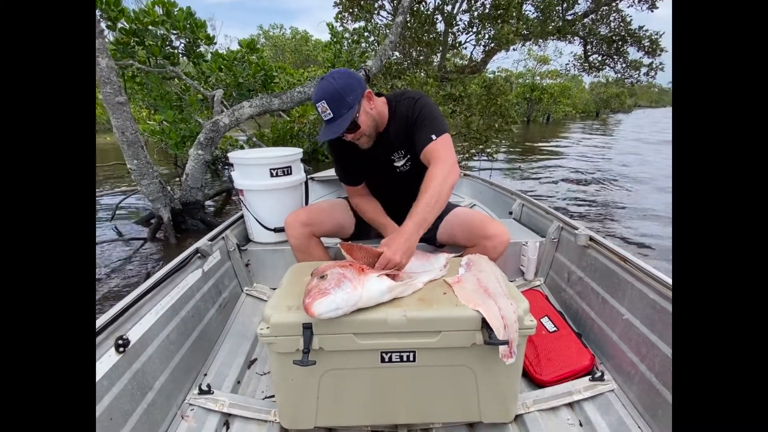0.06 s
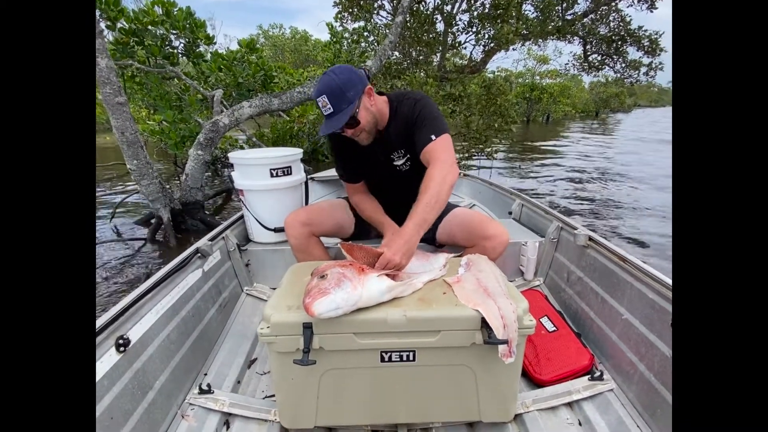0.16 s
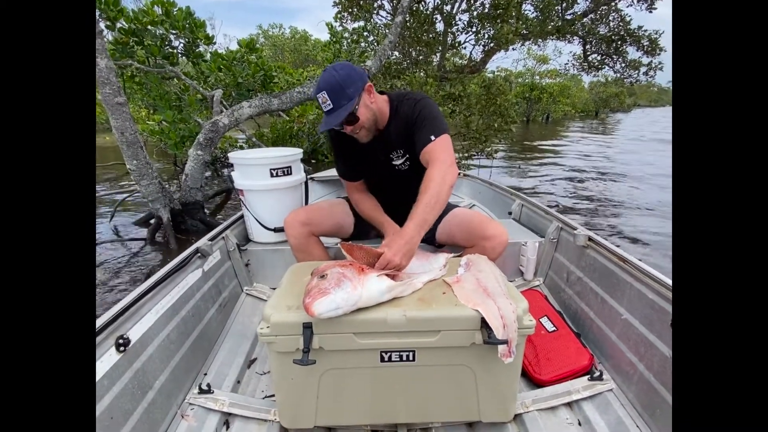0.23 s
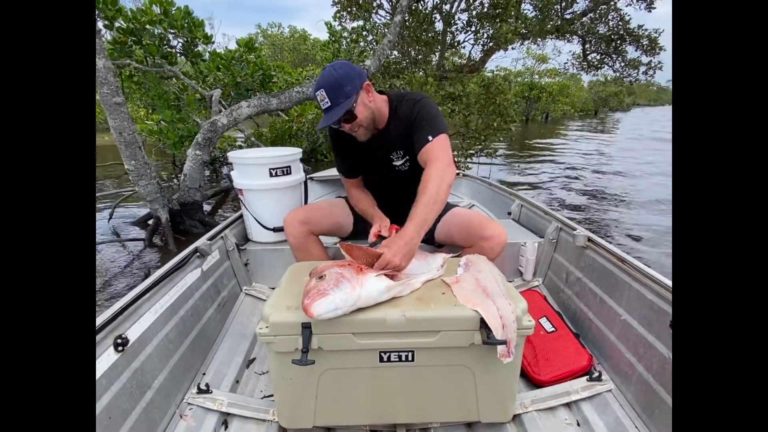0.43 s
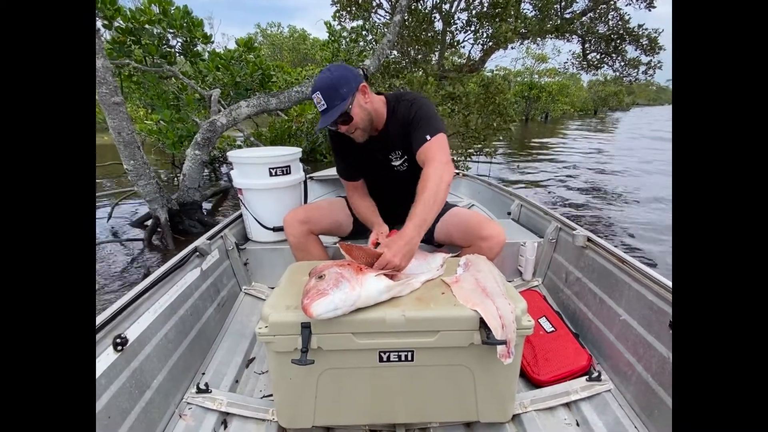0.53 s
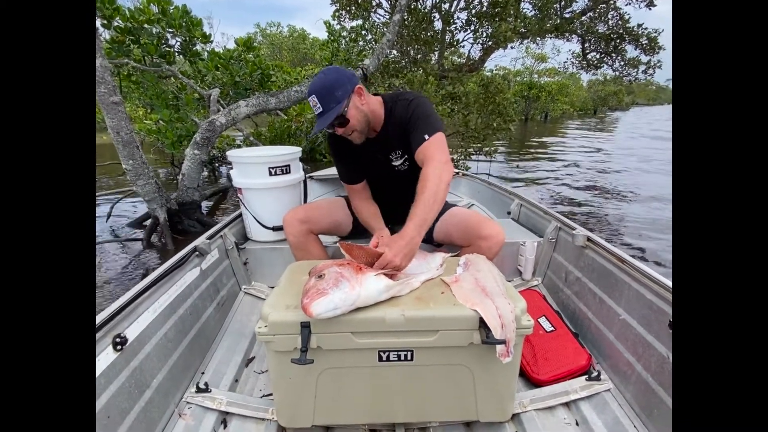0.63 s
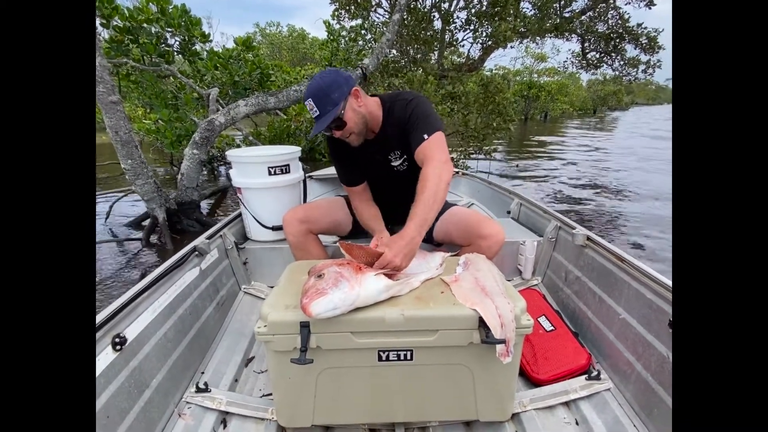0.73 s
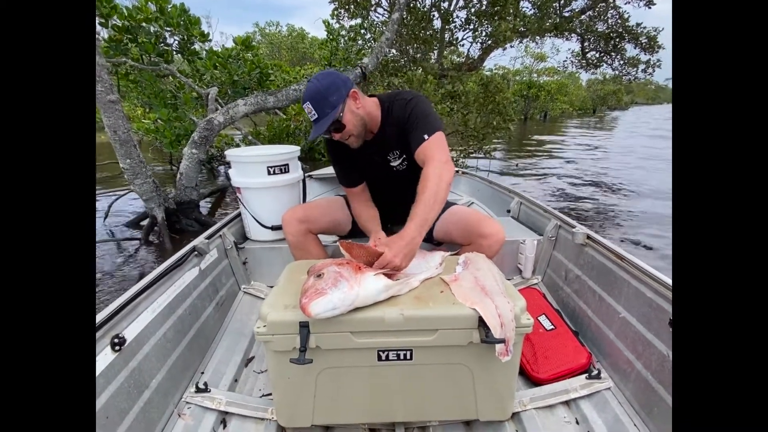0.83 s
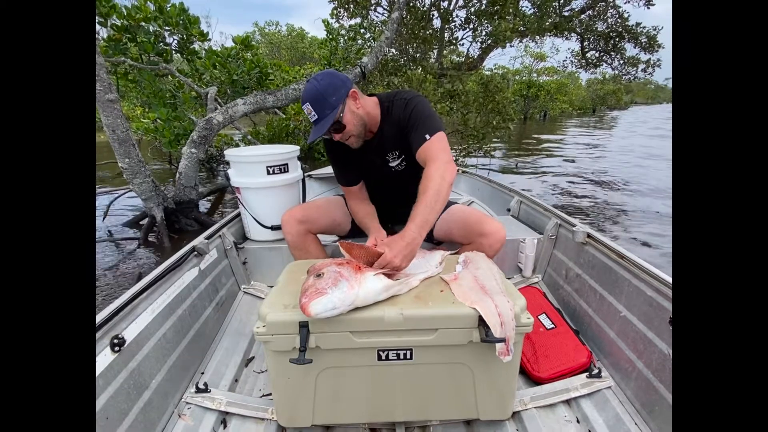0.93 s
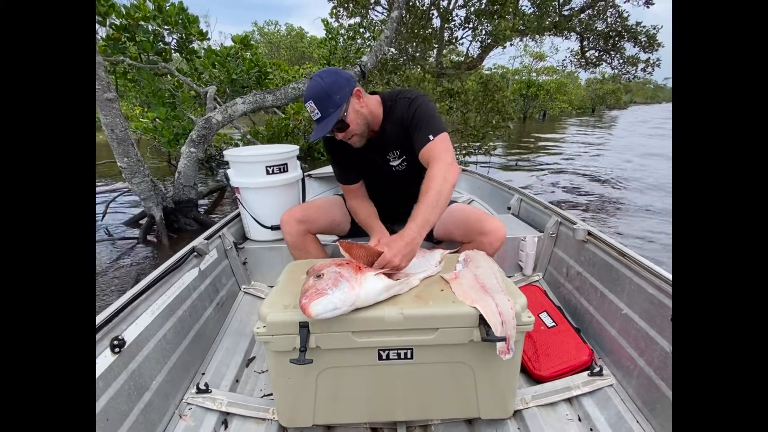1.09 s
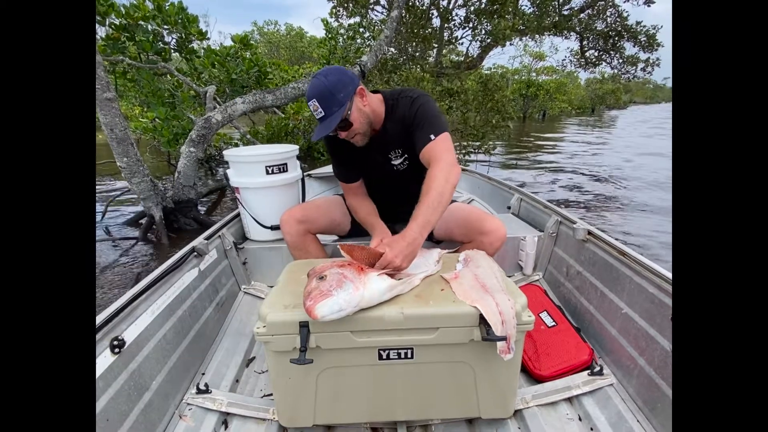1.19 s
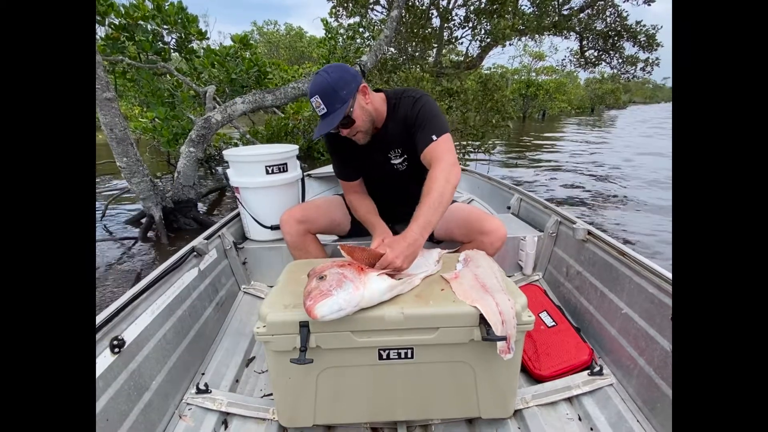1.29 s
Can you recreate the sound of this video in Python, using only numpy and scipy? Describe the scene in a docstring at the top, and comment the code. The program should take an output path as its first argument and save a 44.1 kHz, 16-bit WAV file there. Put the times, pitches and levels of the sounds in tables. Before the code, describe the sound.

A knife works through fish bones, close by. A short scrape leads to the loudest sound, a sharp crunch at about 0.2 seconds, followed by two small snaps and soft wet thumps on a cooler lid until 0.5. Quiet ticks follow, with a thin steel ping near 0.8. Another bone snaps around 1.15, and brief scrapes continue to 1.3. Faint air and lapping water lie underneath.

```python
"""A wet fish slides and thumps softly on a cool box lid, over a faint wash of air and water.
A fillet knife ticks on fine bones and scrapes along the ribs by stick-slip friction. One rib
crunches in a run of tiny fractures as the blade drives the modes of lid, bone and steel.
Smaller bones snap, the fish thumps down, the steel pings off a bone and the scraping goes on.
The sides of the small open boat return short reflections of the work."""
import sys
import numpy as np
from scipy import signal
from scipy.fft import rfft, irfft, next_fast_len
from scipy.io import wavfile

SR = 44100
rng = np.random.default_rng(int(sys.argv[2]) if len(sys.argv) > 2 else 0)


def file_out(sig):
    """Save sig as 16-bit WAV at sys.argv[1]."""
    # one column per channel
    cols = np.atleast_2d(sig).T
    # limit, then scale
    lim = np.clip(cols, -1, 1)
    pcm = np.round(lim * 32767).astype(np.int16)
    wavfile.write(sys.argv[1], SR, pcm)


N = 59535
T = np.arange(N) / SR

# spectrum of air and water (frequency [Hz], gain [dB])
WASH_SPECTRUM = [(18, -67), (30, -45.5), (154, -6.5), (437, -3), (1240, -20), (1410, -19), (2770, -25.5),
                 (4540, -30.5), (6360, -38), (15000, -52.5)]
# course of the fish's sliding (time [s], level [dB])
SLIDE_LEVELS = [(0, -64), (.1, -67), (.16, -71), (.27, -57), (.41, -62.5), (0.472, -68), (.55, -66.5),
                (.66, -72), (0.799, -77), (1.08, -76), (1.201, -69), (1.35, -65)]
# spectrum of skin on the lid (frequency [Hz], gain [dB])
SLIDE_SPECTRUM = [(40, -16), (90, 4.5), (200, 7), (520, 3.5), (850, -2), (1400, 0.5), (2500, -16.5),
                  (4500, -22), (7000, -33.5), (15000, -66.5)]
# blows on the lid (time [s], ring level [dB], frequency [Hz], decay [s], slap level [dB])
THUMPS = [(.003, -65, 201.5, 0.012, -61.5), (.047, -56, 190, 0.0027, -85), (.246, -44, 276, 0.0025, -54),
          (0.255, -54.5, 113, 0.0094, -45.5), (0.345, -56, 287, 0.013, -65.5),
          (0.3694, -40.5, 119, 0.0075, -47.5), (0.4, -48, 173.3, 0.024, -50),
          (0.4185, -44.5, 113, 0.0034, -51.5), (0.475, -60.5, 127.5, 0.017, -64.5),
          (.507, -63, 280, 0.032, -61.5), (0.536, -62.5, 85, 0.015, -59),
          (0.939, -63.5, 335, 0.0056, -69.5), (1.162, -52.5, 398, 0.014, -66),
          (1.189, -56.5, 316, 0.015, -60)]
# spectrum of slapped flesh (frequency [Hz], gain [dB])
SLAP_SPECTRUM = [(50, -36.5), (100, -4), (280, 5), (550, 6), (750, -3.5), (1100, -28), (2500, -35.5),
                 (8000, -62.5)]
# touches of the tip (time [s], level [dB], frequency [Hz], bandwidth [Hz], decay [s])
TICKS = [(0.071, -70.5, 3550, 2200, 0.007), (.153, -65, 1970, 500, 0.014), (0.18, -65, 4570, 5050, 0.001),
         (0.3673, -60.5, 3730, 900, 0.002), (0.4949, -63.5, 4400, 700, 0.0036),
         (.593, -67, 1780, 505, 0.029), (0.673, -54.5, 1480, 323, 0.003), (0.885, -69.5, 1956, 423, 0.016),
         (0.9741, -54, 3770, 1520, 0.0066), (1.039, -68.5, 4470, 1300, 0.0023),
         (1.2062, -65, 6240, 3530, 0.0046), (1.238, -62, 3940, 1820, 0.03)]
# blade strokes (time [s], rise [s], hold [s], decay [s], level [dB], tilt [dB/octave], cutoff [Hz])
STROKES = [(0.176, 0.018, 0.022, 0.0062, -53, 1, 14400), (0.281, 0.0063, .012, 0.014, -54, -4, 9000),
           (0.573, 0.01, 0.057, 0.012, -68.5, -8, 6100), (1.056, 0.094, 0.04, 0.062, -68.5, -0.4, 4860),
           (1.151, 0.0032, 0.0065, 0.041, -57, 0.5, 5300), (1.267, 0.012, 0.013, 0.01, -52, -0.5, 10600),
           (1.304, 0.0072, 0.0067, 0.018, -60, 1.5, 5500)]
# spectrum of steel on bone (frequency [Hz], gain [dB])
SCRAPE_SPECTRUM = [(100, -27), (300, -6.5), (550, 6), (1100, 1), (1900, 2), (4200, -4), (6000, -13),
                   (9000, -23), (15000, -35.5)]
# spectrum of the breaking rib (frequency [Hz], gain [dB])
CRUNCH_SPECTRUM = [(250, -58.5), (650, 0.5), (1200, 2), (2100, -3), (2700, -1), (4400, -2.5), (5600, -8),
                   (7000, -17), (10000, -26.5), (15000, -42.5)]
# one hard push through the rib, two soft knocks (time [s], push [s], gain [dB], cutoff [Hz])
KNOCKS = [(0.2199, 0.02327, -0.5, 9000), (0.261, 0.0062, -11.5, 900), (.302, 0.0083, -20.5, 800)]
# modes of lid, bone and blade (frequency [Hz], level [dB])
MODES = [(443, -39), (500, -33.5), (565, -39.5), (683, -32), (890, -44), (1025, -37.5), (1178, -42.5),
         (1238, -39), (1497, -43.5), (1702, -37), (1778, -41), (2590, -42.5), (3270, -45.5), (4346, -48.5),
         (5372, -44)]
# small bones breaking (time [s], hold [s], decay [s], low ring [Hz], its level [dB],
# high ring [Hz], its level [dB], crack level [dB], cutoff [Hz])
SNAPS = [(0.2985, 0.003, 0.0074, 1700, -53.5, 3230, -45.5, -44, 9100),
         (0.328, 0.0063, 0.0073, 1650, -47.5, 3890, -46.5, -54, 10300),
         (1.159, 0.0013, 0.0074, 1698, -47, 3850, -50, -60, 6900)]
# spectrum of a small bone's crack (frequency [Hz], gain [dB])
CRACK_SPECTRUM = [(250, -21), (650, 7), (1200, 15), (3000, 21), (5000, -2), (8300, -6.5), (15000, -57)]
# resonances of the steel (frequency [Hz], bandwidth [Hz], level [dB])
BLADE_RESONANCES = [(2220, 670, -58), (3530, 520, -65), (4880, 920, -54), (6900, 1040, -64.5)]


def amp(db):
    """Amplitude ratio of a level in decibels."""
    return 10 ** (np.asarray(db) / 20)


def envelope(start, rise, hold, fade):
    """Linear rise, hold and exponential decay, all in seconds."""
    age = T - start
    return np.clip(age / max(rise, 1e-4), 0, 1) * np.exp(-np.maximum(age - rise - hold, 0) / fade)


def match_energy(x, env):
    """Normalisation: x takes the energy of unit noise under the envelope."""
    return x * np.sqrt(np.sum(env ** 2) / (np.sum(x ** 2) + 1e-20))


def colour(x, spectrum, tilt_db=0):
    """Minimum-phase filtering by a spectrum, tilted per octave above 500 Hz."""
    size = next_fast_len(2 * N)
    size += size % 2
    octave = np.log2(np.maximum(np.arange(size // 2 + 1) * SR / size, 10))
    hz, db = np.array(spectrum, float).T
    gain_db = np.interp(octave, np.log2(hz), db) + tilt_db * np.maximum(octave - np.log2(500), 0)
    cepstrum = irfft(np.log(amp(gain_db)))
    cepstrum[1:size // 2] *= 2  # folding makes the filter causal
    cepstrum[size // 2 + 1:] = 0
    return irfft(rfft(x, size) * np.exp(rfft(cepstrum)))[:N]


def resonate(x, hz, width_hz, order=1):
    """Band-pass resonance; a higher order has steeper sides."""
    low = np.hypot(hz, width_hz / 2) - width_hz / 2
    sos = signal.butter(order, [low, low + width_hz], "band", fs=SR, output="sos")
    return signal.sosfilt(sos, x + 1e-18)


def butterworth(x, hz, kind, order):
    """Maximally flat low-pass or high-pass filtering."""
    return signal.sosfilt(signal.butter(order, hz, kind, fs=SR, output="sos"), x + 1e-18)


def waver(per_s, db):
    """Random modulation: a factor that wanders by about db."""
    drift = np.interp(T * per_s, np.arange(N), rng.standard_normal(N))
    return amp(db * np.clip(drift, -2, 2))


def grit(per_s, scatter_db=4, hiss=0.64):
    """Shot noise: randomly timed clicks over friction hiss."""
    clicks = (rng.random(N) < per_s / SR) * rng.choice([-1, 1], N)
    clicks = clicks * amp(scatter_db * np.clip(rng.standard_normal(N), -2, 2))
    return clicks / clicks.std() + hiss * rng.standard_normal(N)


def air_and_water():
    """Ambient noise: steady air above, and lapping water that modulates the low band."""
    crossover_hz = 630
    air, water = (colour(rng.standard_normal(N), WASH_SPECTRUM) for _ in range(2))
    air = butterworth(air, crossover_hz, "high", order=2)
    water = butterworth(water, crossover_hz, "low", order=2) * waver(per_s=22, db=5)
    wash = air + water
    return amp(-72.5) * wash / wash.std()


def fish_slide():
    """Stick-slip friction: wet skin drags over the lid in small steps."""
    times, db = np.array(SLIDE_LEVELS).T
    env = amp(np.interp(T, times, db))
    return match_energy(colour(env * grit(per_s=500, hiss=0.9), SLIDE_SPECTRUM), env)


def lid_thumps():
    """Soft impact: fish and hands slap the lid and excite a low ring of falling pitch."""
    out = 0
    for start, db, hz, fade, slap_db in THUMPS:
        env = envelope(start, 0.002, 0.0066, fade)
        sag = np.exp(-np.maximum(T - start, 0) / 0.0067) - 0.5
        pitch = hz * (1 + 0.096 * sag)
        flutter = waver(per_s=190, db=3.5)  # flesh damps the ring unevenly
        ring = env * flutter * np.sin(2 * np.pi * np.cumsum(pitch * (T >= start)) / SR)
        contact = envelope(start - 0.004, 0.0013, 0.011, 0.015)
        slap = colour(contact * grit(per_s=900), SLAP_SPECTRUM)
        out += amp(db) * match_energy(ring, env) + amp(slap_db) * match_energy(slap, contact)
    return out


def hull_reflections(x):
    """Scattering from the boat's sides: convolution with a short burst of decaying noise."""
    echo = resonate(rng.standard_normal(N), hz=1500, width_hz=9700) * envelope(0.00094, 0.009, 0, 0.013)
    return amp(-19.5) * signal.fftconvolve(x, echo / np.linalg.norm(echo))[:N]


def tip_ticks():
    """Impulsive excitation: each touch on fine bone or wet flesh sounds one resonance."""
    out = 0
    for start, db, hz, width, fade in TICKS:
        onset = 0.42 * envelope(start, 0.00037, 0, 0.00137)
        env = onset + envelope(start, 0.00027, 0.0018, fade)
        out += amp(db) * match_energy(resonate(env * rng.standard_normal(N), hz, width, order=4), env)
    return out


def blade_scrapes():
    """Stick-slip friction: the edge catches unevenly along bone, and flesh absorbs the treble."""
    out = 0
    for start, rise, hold, fade, db, tilt_db, top_hz in STROKES:
        env = envelope(start, rise, hold, fade)
        chatter = waver(per_s=300, db=2)
        force = env * chatter * grit(per_s=2200, scatter_db=0, hiss=0.61)
        scrape = butterworth(colour(force, SCRAPE_SPECTRUM, tilt_db), top_hz, "low", order=2)
        out += amp(db) * match_energy(scrape, env)
    return out


def rib_crunch():
    """Brittle fracture: a rib fails in a run of tiny cracks that tapers into bright splintering."""
    start, rise, hold, fade = 0.2188, 0.011, 0.0065, 0.0095  # s
    fractures_per_s = 3100
    first_crack = 0.67 * envelope(start, 0.0023, 0.0021, fade)
    env = np.maximum(first_crack, envelope(start, rise, hold, fade))
    force = env * grit(fractures_per_s, scatter_db=2.5, hiss=0.52)
    muffled = np.clip((T - start - 0.015) / 0.011, 0, 1)  # flesh dulls the last fractures
    force = (1 - muffled) * force + muffled * butterworth(force, 3800, "low", order=1)
    crackle = colour(force, CRUNCH_SPECTRUM)
    tail = envelope(start, rise, hold, fade=0.013)
    splinters = colour(tail * grit(fractures_per_s), CRUNCH_SPECTRUM, tilt_db=5)
    return amp(-30.5) * match_energy(crackle, env) + amp(-53) * match_energy(splinters, tail)


def blade_knocks():
    """Forced vibration: the blade drives the modes, the low ones longest, until the hand damps them."""
    rise_share, linger_hz = 0.4, 176
    out = 0
    for start, push, knock_db, top_hz in KNOCKS:
        for hz, db in MODES:
            drive = push * (1 + linger_hz / hz)
            env = envelope(start, rise_share * drive, (1 - rise_share) * drive, fade=0.0021)
            rolloff = 1 / np.hypot(1, (hz / top_hz) ** 2)  # soft knocks ring only the low modes
            out += amp(db + knock_db) * rolloff * env * np.sin(2 * np.pi * (hz * T + rng.random()))
    return out


def bone_snaps():
    """Brittle fracture: a small bone breaks and crackles, exciting a clear ring and a broad higher one."""
    break_share = 0.0395  # energy of the first break relative to the crackle
    out = 0
    for start, hold, fade, low_hz, low_db, high_hz, high_db, crack_db, top_hz in SNAPS:
        env = envelope(start, 0.00062, hold, fade)
        force = env * grit(per_s=2200, scatter_db=0, hiss=0.44)
        force[int(start * SR)] += np.sqrt(break_share * np.sum(force ** 2))
        pitch = low_hz * waver(per_s=900, db=0.63)  # wavers as the bone gives
        ring = envelope(start, 0, hold, fade=0.0068)
        low = amp(low_db) * match_energy(ring * np.sin(2 * np.pi * np.cumsum(pitch) / SR), ring)
        high = amp(high_db) * match_energy(resonate(force, high_hz, width_hz=1330, order=2), env)
        crack = amp(crack_db) * match_energy(colour(force, CRACK_SPECTRUM), env)
        out += butterworth(low + high + crack, top_hz, "low", order=8)
    return out


def blade_ping():
    """Free vibration: flicked off a bone, the steel buzzes briefly and one thin, rough tone lingers."""
    start, rise = 0.8342, 0.0019  # s
    env = envelope(start, rise, hold=0.0028, fade=0.0065)
    out = 0
    for hz, width, db in BLADE_RESONANCES:
        buzz = env * resonate(rng.standard_normal(N), hz, width, order=3)
        out += amp(db) * match_energy(buzz, env)
    tail = envelope(start, rise, hold=0, fade=0.017)
    tone = tail * resonate(rng.standard_normal(N), hz=4950, width_hz=320, order=2)
    return out + amp(-62) * match_energy(tone, tail)


def scene():
    """Superposition of the knife work, its reflections and the outdoor wash."""
    work = rib_crunch() + blade_knocks() + bone_snaps() + blade_ping()
    work += tip_ticks() + lid_thumps() + blade_scrapes() + fish_slide()
    return (work + hull_reflections(work) + air_and_water())[None]


def record(dry):
    """Band limiting: the deepest bass and the highest treble are cut."""
    thin = butterworth(dry, 50, "high", order=3)
    return signal.sosfilt(signal.ellip(8, 0.2, 70, 15600, fs=SR, output="sos"), thin)


dry = scene()
out = record(dry)
file_out(out)
```